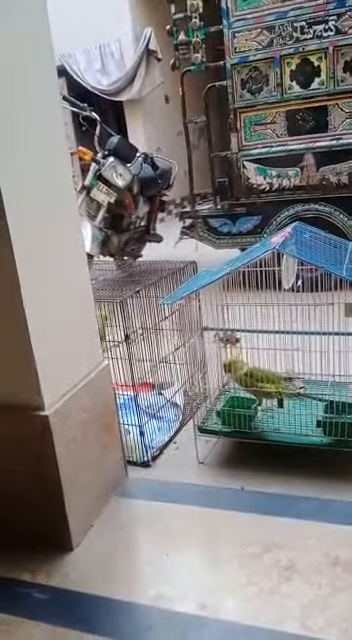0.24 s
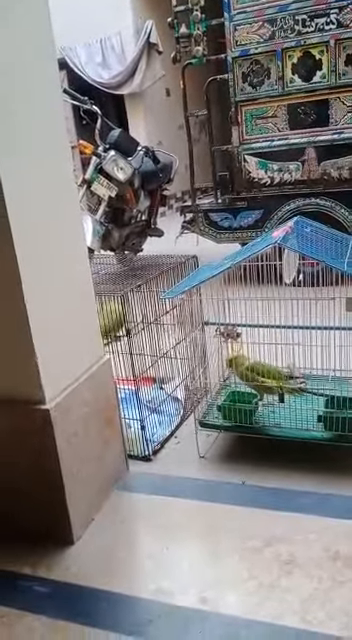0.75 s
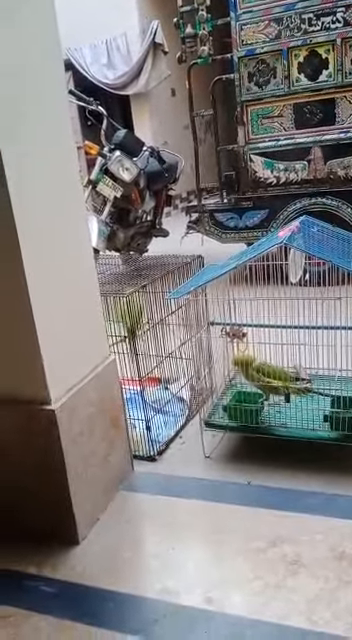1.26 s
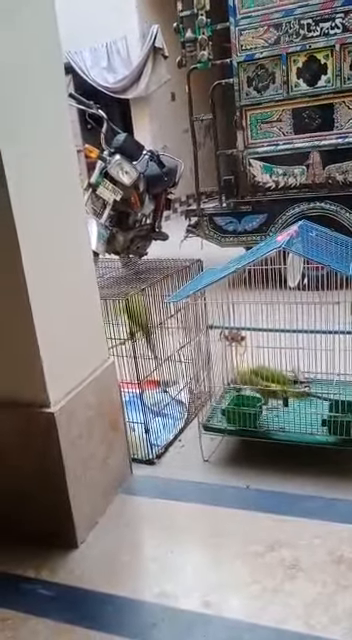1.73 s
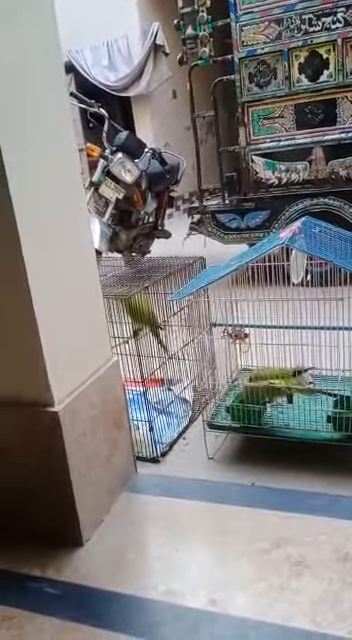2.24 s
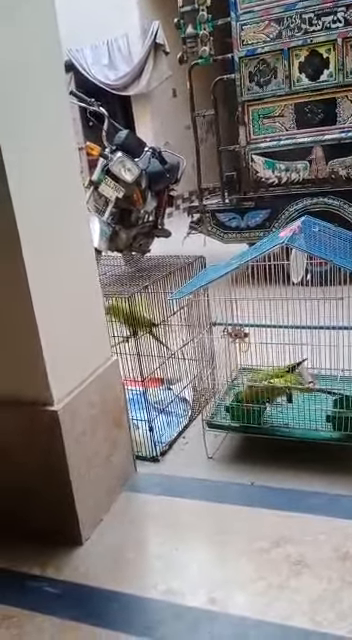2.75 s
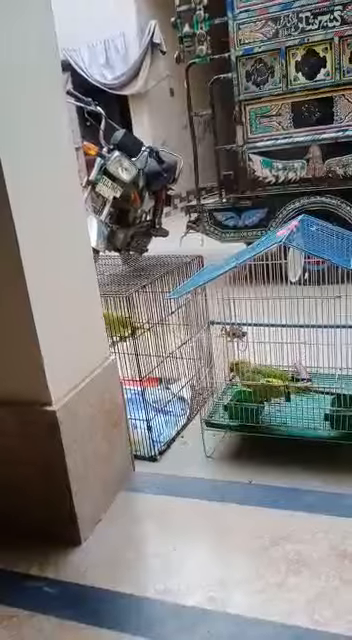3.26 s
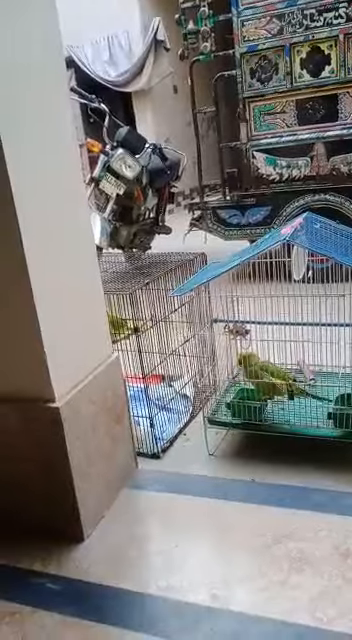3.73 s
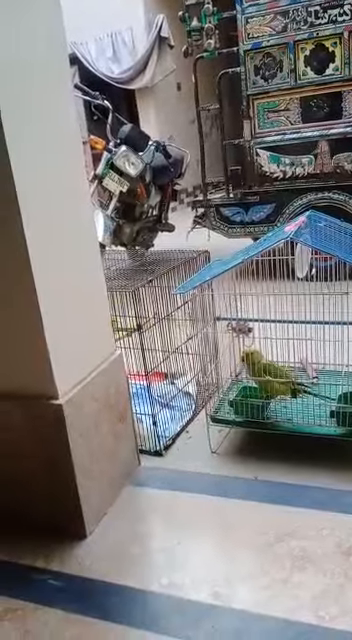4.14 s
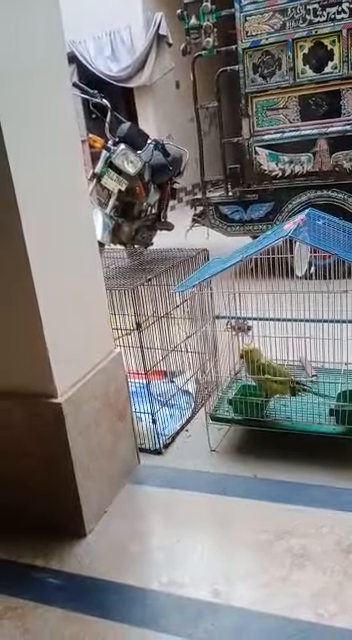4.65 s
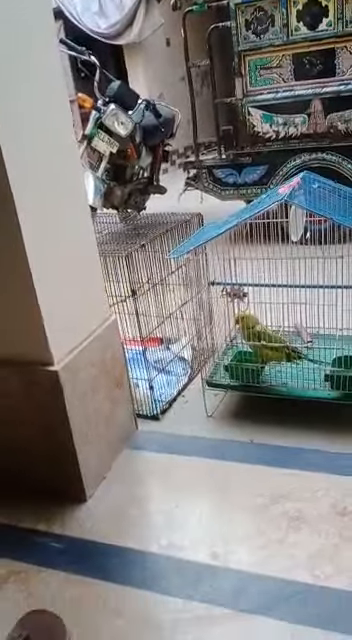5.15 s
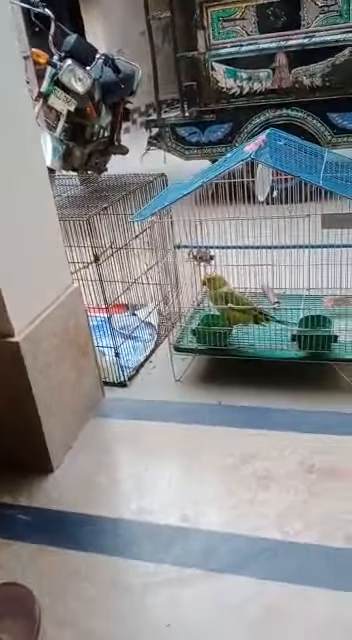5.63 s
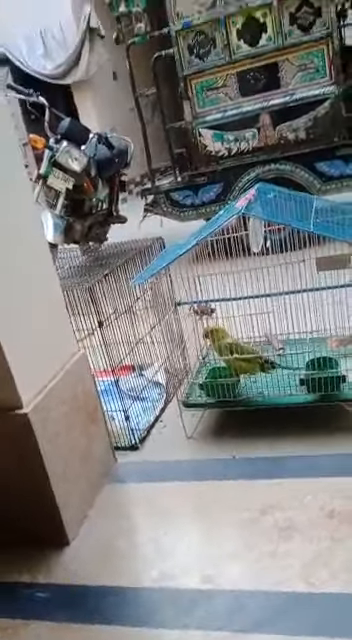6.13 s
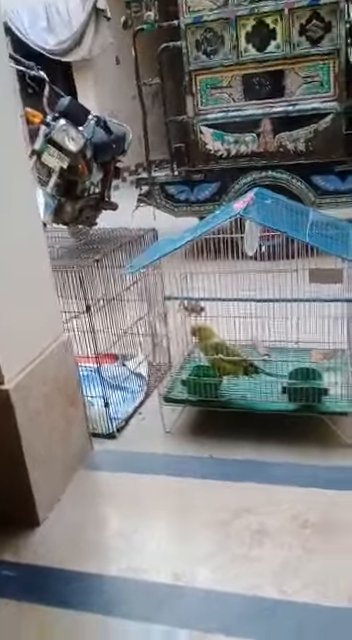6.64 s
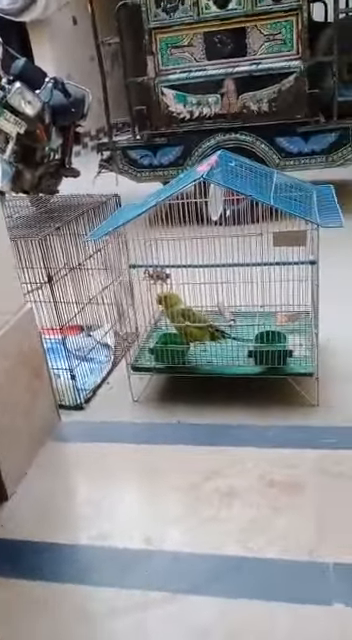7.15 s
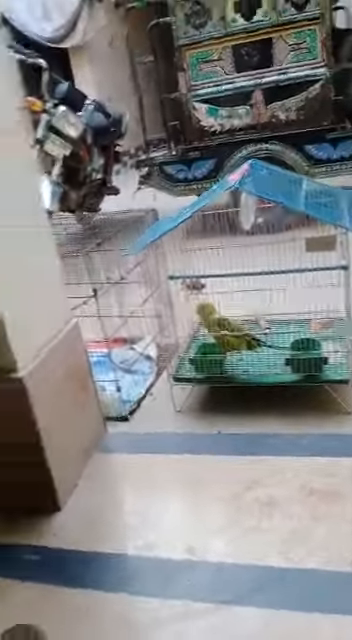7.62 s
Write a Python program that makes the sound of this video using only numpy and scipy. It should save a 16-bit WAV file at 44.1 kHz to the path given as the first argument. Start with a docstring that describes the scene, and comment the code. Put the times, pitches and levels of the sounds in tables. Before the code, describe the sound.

Parakeets give quick bright chirps and harsh squawks in an echoing tiled entrance, thinning to soft cheeps, then one long rising call over faint street noise.

```python
"""Two caged parakeets call in a tiled entrance: gliding chirps, harsh squawks, then one long rising call.
Each voice is a stack of harmonics that roughness breaks up, filtered by throat, windpipe and beak.
Softer cheeps and faint far birds are gliding sines; the street's drone, hum, wash and dull bumps are
filtered noise, its bustle blurred sines. Echoes and a decaying tail surround all but the drone, hum and wash."""
import sys
import numpy as np
from scipy import signal
from scipy.fft import rfft, irfft, next_fast_len
from scipy.io import wavfile
from scipy.ndimage import uniform_filter1d

SR = 44100
rng = np.random.default_rng(int(sys.argv[2]) if len(sys.argv) > 2 else 0)


def transcribe(signal):
    """Save signal, clipped to [-1, 1], as a 16-bit WAV file at the path in sys.argv[1]."""
    frames = np.atleast_2d(signal).T
    limited = np.clip(frames, -1, 1)
    pcm = np.round(limited * 32767).astype(np.int16)
    wavfile.write(sys.argv[1], SR, pcm)


N = 347949
T = np.arange(N) / SR

# broad filtering by the bird's throat: frequency_hz, gain_db
THROAT_SPECTRUM = [(500, -41.5), (800, -17), (1100, -6), (1700, -2.5), (2400, 6), (3700, 6.5), (4600, 2.5),
                   (5600, -5.5), (6500, -23), (8000, -49.5), (9500, -79.5), (11500, -55), (14000, -49.5),
                   (16000, -39.5)]


def from_db(db):
    """Level to amplitude: 20 dB is a factor of ten."""
    return 10 ** (np.asarray(db) / 20)


def rms_one(x):
    """Normalization: scales a signal to unit root-mean-square."""
    return x / np.sqrt(np.mean(x ** 2) + 1e-20)


def at_hz(points, hz):
    """Logarithmic pitch scale: interpolates a table along log frequency."""
    points = np.array(points)
    return np.interp(np.log(np.maximum(hz, 1)), np.log(points[:, 0]), points[:, 1])


def colour(x, spectrum):
    """Linear filtering: multiplies the Fourier spectrum by a smooth gain curve."""
    size = next_fast_len(len(x) + 512)
    gain = from_db(at_hz(spectrum, np.fft.rfftfreq(size, 1 / SR)))
    return irfft(rfft(x, size) * gain, size)[:len(x)]


def band(x, low_hz, high_hz):
    """Band-pass filtering: keeps the energy between two frequencies."""
    return signal.sosfilt(signal.butter(2, [low_hz, high_hz], "band", fs=SR, output="sos"), x)


def wobble(rate_hz, size=N, count=()):
    """Low-passed noise: random motion up to a given rate, one track or several, of spread 1."""
    settling = 1000  # samples dropped while the filter starts
    noise = rng.standard_normal((*count, size + settling))
    lowpass = signal.butter(4, rate_hz, fs=SR, output="sos")
    return rms_one(signal.sosfilt(lowpass, noise)[..., -size:])


def swell(start_s, length_s):
    """Half-sine envelope: returns a short sound's samples, its progress 0-1 and its rounded level."""
    at = np.arange(int(start_s * SR), min(N, int((start_s + length_s) * SR)))
    progress = np.linspace(0, 1, len(at))
    return at, progress, np.sin(np.pi * progress)


def glide_tone(pitch_hz):
    """Frequency modulation: the phase of a sine is the running sum of its pitch."""
    return np.sin(2 * np.pi * np.cumsum(pitch_hz) / SR)


def porch(x, early_db, tail_db, early_s=0.035, build_s=0.053):
    """Reverberation: floor, pillar and walls return sharp echoes; behind them a tail dies band by band."""
    # reverberation time, for a 60 dB decay: frequency_hz, decay_s
    decay_times = [(300, 0.067), (1500, 0.4), (3000, 0.39), (5500, 0.39), (14000, 0.4)]
    t = T[:SR]
    sparse = rng.random(SR) < 700 / SR  # about 700 echoes per second
    echoes = rng.standard_normal(SR) * sparse * np.exp(-t / early_s) * (t > .002)
    edges_hz = np.geomspace(100, 16000, 9)
    tail = np.zeros(SR)
    for low_hz, high_hz in zip(edges_hz, edges_hz[1:]):
        decay_s = at_hz(decay_times, np.sqrt(low_hz * high_hz))
        tail += band(rng.standard_normal(SR), low_hz, high_hz) * 1000 ** (-t / decay_s)
    tail *= 1 - np.exp(-t / build_s)
    # early and tail levels are relative to the direct sound
    response = from_db(early_db) * echoes / np.linalg.norm(echoes)
    response += from_db(tail_db) * tail / np.linalg.norm(tail)
    response[0] += 1
    return signal.fftconvolve(x, response / np.linalg.norm(response))[:N]


def street(wash_db=-55.5, hum_hz=398, hum_db=-68):
    """Filtered noise: a broad wash of far traffic, a low drone band and a narrow, wavering hum."""
    # shape of the wash, density relative: frequency_hz, density_db
    wash_spectrum = [(30, -29.5), (60, -20), (130, -18.5), (240, -1.5), (400, -6.5), (700, -7), (850, -11),
                     (1350, -6.5), (2200, -12.5), (3500, -20.5), (4800, -26), (6600, -38.5), (8000, -62),
                     (11000, -60.5), (14500, -51.5)]
    # course of the low drone: time_s, level_db
    drone_level = [(0, -63), (.22, -79), (.37, -58), (.57, -76.5), (.77, -61.5), (1.93, -63), (2.68, -72.5),
                   (2.83, -62.5), (3.18, -73.5), (3.5, -65), (4.2, -75), (4.57, -74), (4.66, -63),
                   (5.4, -66), (5.78, -62), (6.4, -65.5), (7.35, -74.5), (7.89, -71.5)]
    waver = from_db(.5 * wobble(rate_hz=6))
    wash = from_db(wash_db) * waver * rms_one(colour(rng.standard_normal(N), wash_spectrum))
    drone_noise = rms_one(band(rng.standard_normal(N), 82, 111.4))
    drone = from_db(np.interp(T, *np.transpose(drone_level))) * drone_noise
    hum = from_db(hum_db) * rms_one(band(rng.standard_normal(N), hum_hz - 10, hum_hz + 10))
    return wash + drone + hum


def bustle(count=130, low_hz=210, high_hz=2400, level_db=-60, fall_db=3, spread_db=8,
           length_s=0.055, blur=.05):
    """Random frequency modulation: indistinct street activity as faint blurred swells."""
    out, shake = np.zeros(N), wobble(rate_hz=75)
    for when, height, distance in rng.random((count, 3)):
        at, _, envelope = swell(when * (T[-1] - length_s), length_s)
        pitch_hz = low_hz * (high_hz / low_hz) ** height * (1 + blur * shake[at])
        amplitude = from_db(level_db - fall_db * height - spread_db * distance)
        out[at] += amplitude * envelope * glide_tone(pitch_hz)
    return out


def bumps(spread=1.132):
    """Narrow-band noise: far knocks, blurred by distance into short low swells."""
    # dull bumps in the street: start_s, length_s, centre_hz, level_db
    bump_list = [(0.427, 0.072, 447, -55), (1.135, 0.1, 420, -52.5), (1.585, 0.095, 243, -44.5),
                 (1.795, 0.099, 241, -53), (2.104, 0.15, 244, -51), (2.645, 0.061, 376, -52),
                 (3.233, 0.079, 243, -52.5), (3.463, 0.077, 251, -53.5), (3.713, 0.12, 594, -53.5),
                 (4.253, 0.068, 266, -49), (5.237, 0.061, 237, -54), (5.427, 0.098, 397, -53.5),
                 (7.071, 0.14, 402, -53), (7.093, .08, 238, -54), (6.177, 0.051, 92, -53)]
    out = np.zeros(N)
    for start_s, length_s, centre_hz, level_db in bump_list:
        at, _, envelope = swell(start_s, length_s)
        noise = band(rng.standard_normal(SR), centre_hz / spread, centre_hz * spread)
        out[at] += from_db(level_db) * envelope * rms_one(noise[-len(at):])
    return out


def twitter(count=130, low_hz=2200, high_hz=6000, level_db=-62, fall_db=9, spread_db=7,
            length_s=0.049, glide=0.027):
    """Gliding sines: small birds far down the street slur faintly at random, weaker with height."""
    out = np.zeros(N)
    for when, height, slope, distance in rng.random((count, 4)):
        at, progress, envelope = swell(when * (T[-1] - length_s), length_s)
        pitch_hz = (low_hz + (high_hz - low_hz) * height) * (1 + glide * (.5 - slope) * progress)
        amplitude = from_db(level_db - fall_db * height - spread_db * distance)
        out[at] += amplitude * envelope * glide_tone(pitch_hz)
    return out


def cheeps(trill_hz=170, unevenness=.25):
    """Frequency modulation: thin whistles glide while a fast, uneven trill sweeps their pitch."""
    # cheeps, and first the fading echo of an earlier call:
    # start_s, length_s, start_hz, end_hz, trill_depth_hz, level_db
    cheep_list = [(0, 0.064, 2210, 2236, 80.4, -48), (1.727, 0.097, 2555, 2850, 58.9, -46),
                  (1.763, 0.081, 3123, 3840, 460, -39.5), (1.809, 0.061, 4140, 4320, 117, -43.5),
                  (2.468, 0.19, 4610, 4380, 40, -67), (3.269, .11, 3810, 3570, 39.4, -61),
                  (3.577, 0.11, 3145, 3680, 460, -38), (3.734, 0.14, 3936, 3750, 50, -54.5),
                  (3.74, .12, 4530, 4280, 40, -64), (4.265, 0.062, 5800, 5580, 50, -64.5),
                  (4.302, 0.15, 4470, 3750, 60, -57.5), (4.726, 0.052, 2603, 2610, 60.4, -50),
                  (4.762, 0.078, 3140, 3770, 490, -38.5), (4.801, 0.12, 4110, 4010, 60.7, -48.5),
                  (4.945, 0.11, 4010, 3630, 29.8, -57.5), (4.952, 0.07, 4280, 4540, 50, -58.5),
                  (5.044, 0.035, 2170, 2186, 29.4, -57), (5.266, 0.052, 4700, 4440, 40, -61),
                  (5.686, 0.05, 4450, 3240, 80, -55.5), (6.09, 0.15, 4370, 3990, 368, -45),
                  (6.109, 0.07, 3590, 3430, 29.8, -45.5), (6.156, 0.078, 3484, 2970, 284, -37),
                  (6.203, 0.1, 3566, 3470, 645, -49.5), (6.348, 0.091, 4580, 4030, 40, -57),
                  (6.822, 0.064, 4460, 4400, 40.4, -62.5)]
    out = np.zeros(N)
    trill = glide_tone(trill_hz * (1 + unevenness * wobble(rate_hz=140)))
    for start_s, length_s, start_hz, end_hz, depth_hz, level_db in cheep_list:
        at, progress, envelope = swell(start_s, length_s)
        pitch_hz = start_hz + (end_hz - start_hz) * progress + depth_hz * trill[at]
        # the root of two gives the sine unit RMS
        out[at] += from_db(level_db) * envelope * np.sqrt(2) * glide_tone(pitch_hz)
    return out


def resonance(hz, centre_hz, width_hz):
    """Resonance curve: a bell of height 1 that halves at width_hz from its centre."""
    return 1 / (1 + ((hz - centre_hz) / width_hz) ** 2)


def syrinx(pitch_hz, rough, windpipe_hz, beak_hz, bright_db, jitter=0.045, quaver=0.01,
           windpipe_db=8, beak_db=10, bright_hz=4800):
    """Source and filter: roughness makes harmonics uneven, blurs them and adds half-pitch partials."""
    size = len(pitch_hz)
    unevenness = (quaver + jitter * rough) * wobble(rate_hz=270, size=size)
    phase = 2 * np.pi * np.cumsum(pitch_hz * (1 + unevenness)) / SR
    order = np.arange(2, 21)[:, None] / 2  # 1, 1.5, 2 ... 10 times the pitch
    hz = order * pitch_hz
    tracks = dict(size=size, count=(len(order),))
    # windpipe and open beak lift the partials near their resonances
    lift_db = windpipe_db * resonance(hz, windpipe_hz, width_hz=110)
    lift_db += beak_db * resonance(hz, beak_hz, width_hz=530)
    # brightness acts as a steep shelf above bright_hz
    lift_db += bright_db / (1 + (bright_hz / hz) ** 20)
    # each partial swells and fades a little by itself
    lift_db += 2.2 * wobble(rate_hz=45, **tracks)
    chaos = rough * (wobble(rate_hz=207, **tracks) + 1j * wobble(rate_hz=200, **tracks))
    whole = order % 1 == 0
    strength = np.where(whole, 1 - rough + chaos, rough * chaos)
    waves = np.real(strength * np.exp(1j * order * phase))
    partials = from_db(lift_db) * waves / np.sqrt(np.maximum(order, 2))
    return rms_one(colour(partials.sum(axis=0), THROAT_SPECTRUM))


def utter(pitch_hz, rough, windpipe_hz, beak_hz, bright_db, rasp_db, high_band_db):
    """Added noise: a broad rasp and a very faint high band grow with roughness; level evened to 1."""
    rough = np.clip(rough, 0, 1)
    noise = rng.standard_normal(len(pitch_hz))
    rasp = from_db(rasp_db) * rms_one(colour(noise, THROAT_SPECTRUM))
    high_band = from_db(high_band_db) * rms_one(band(band(noise, 12500, 15500), 12500, 15500))
    voice = syrinx(pitch_hz, rough, windpipe_hz, beak_hz, bright_db) + rough * (rasp + high_band)
    # dividing by the running RMS leaves the level to the caller's envelope
    return voice / np.sqrt(uniform_filter1d(voice ** 2, size=500) + 1e-9)


def parakeets(opening_db=5, arch=1.5, collapse=2.4, release_s=.005, rasp_release_s=.031):
    """Pitch contour and resonance: short calls climb, then fall, and brighten as the beak opens."""
    # syllables: start_s, length_s, attack_s, top_s (from the start), start_hz, top_hz, end_hz, level_db,
    # crescendo_db, rough_start (0-1), rough_end (0-1), windpipe_hz, beak_hz, bright_db
    # (roughness above 1 is limited to 1 in the voice)
    syllables = [ (.036, .056, 0.018, 0.041, 1153, 1302, 1305, -28.5, 6.5, 0.26, .02, 2570, 3640, 9),
                 (0.091, 0.077, 0.0028, .006, 1077, 1049, 968, -30.5, -7.5, 0.34, 0.5, 2040, 3790, 4.5),
                 (0.281, 0.12, 0.07, 0.063, 1324, 1566, 1372, -27.5, 2, 0.27, 0.26, 1480, 3280, 6),
                 (0.589, 0.07, 0.031, 0.0028, 1454, 1405, 1320, -32, 1, 0.1, 0, 2700, 4300, 13),
                 (0.65, 0.076, 0.0059, 0.003, 1300, 1258, 1121, -32, -1, 0.19, 0, 2334, 4930, 2.5),
                 (1.006, .103, 0.036, .028, 1676, 1966, 1221, -26, 11, 0.53, 0.28, 1680, 2750, 2.5),
                 (1.375, 0.12, 0.026, 0.032, 1149, 1756, 1301, -20.5, -2.5, 0.36, .58, 1505, 2840, -0.5),
                 (2.118, .098, 0.04, .05, 1056, 1158, 1123, -31.5, -5.5, 0.4, 1.17, 2230, 3750, -7.5),
                 (2.214, 0.026, 0.0071, 0.022, 1496, 1560, 1560, -34, 1, 0.3, .2, 1550, 3200, 1.5),
                 (2.233, .085, 0.012, .038, 1710, 1994, 1718, -28, 0, .1, .07, 1940, 3700, 6),
                 (2.312, .014, .006, 0.0026, 1710, 1742, 1565, -13.5, -2, 0.02, 0.17, 1950, 3400, -4.5),
                 (2.326, .048, 0.0052, 0.038, 1510, 1520, 1504, -30.5, -3.5, .12, 0.5, 1660, 3250, -1.5),
                 (2.712, 0.15, .028, 0.051, 1065, 1198, 1008, -23, 1.5, 0.78, 0.77, 1090, 2370, -9.5),
                 (3.422, 0.035, .014, 0.01, 1590, 1540, 1522, -29.5, 1, 0.47, 0.39, 2330, 3000, 0.5),
                 (3.449, 0.11, 0.021, 0.00598, 1487, 1470, 1177, -24.5, 2, .6, 0.38, 2380, 3030, 4)]
    out = np.zeros(N)
    for (start_s, length_s, attack_s, top_s, start_hz, top_hz, end_hz, level_db, crescendo_db,
         rough_start, rough_end, windpipe_hz, beak_hz, bright_db) in syllables:
        at, progress, _ = swell(start_s, length_s)
        t = progress * length_s
        # clear notes arch over; rough ones drop at once
        fall_power = max(arch - collapse * (rough_start + rough_end) / 2, .4)
        climb = np.sin(np.pi / 2 * np.minimum(t / top_s, 1))
        fall = np.clip((t - top_s) / max(length_s - top_s, 1e-3), 0, 1) ** fall_power
        pitch_hz = start_hz + (top_hz - start_hz) * climb + (end_hz - top_hz) * fall
        rough = rough_start + (rough_end - rough_start) * progress
        # a clear note stops at once; a rough one dies away more slowly
        ending_s = release_s + rasp_release_s * rough_end
        ramp = np.clip(np.minimum(t / attack_s, (length_s - t) / ending_s), 0, 1)
        gate = np.sin(np.pi / 2 * ramp) ** 2
        envelope = gate * from_db(level_db + crescendo_db * (progress - .5))
        brightness_db = bright_db + opening_db * (progress - .5)
        out[at] += envelope * utter(pitch_hz, rough, windpipe_hz, beak_hz, brightness_db,
                                    rasp_db=-14.5, high_band_db=-49.5)
    return out


def long_call(fade_s=.006):
    """Pitch contour: one call rises by almost an octave, clears at the top and breaks up as it falls."""
    # course of the voice: time_s, pitch_hz, rough (0-1), windpipe_hz, beak_hz, bright_db
    call_course = [(7.045, 689, 0.24, 2150, 3500, -13), (7.138, 720, 0.41, 1550, 4140, -25),
                   (7.2, 837, 0.09, 1630, 4200, -13), (7.245, 916, 0.09, 1730, 3800, -2),
                   (7.295, 1071, 0.32, 1960, 4300, 5.5), (7.335, 1120, 0.07, 1125, 4560, 7),
                   (7.366, 1162, 0.09, 1160, 4030, -6), (7.418, 1319, 0.03, 1340, 3070, -10),
                   (7.451, 1217, 0.18, 1260, 3470, -8), (7.481, 1079, 0.33, 2150, 3500, 6.5),
                   (7.56, 904, 0.66, 2000, 3900, -5.5)]
    # course of its level: time_s, level_db
    call_level = [(7.045, -55), (7.115, -46.5), (7.145, -35), (7.22, -29.5), (7.31, -31.5), (7.39, -28),
                  (7.463, -29), (7.5, -41.5), (7.56, -53)]
    out = np.zeros(N)
    time_s, *columns = np.transpose(call_course)
    at = np.arange(int(time_s[0] * SR), int(time_s[-1] * SR))
    t = T[at]
    edges = np.clip(np.minimum(t - time_s[0], time_s[-1] - t) / fade_s, 0, 1)
    tracks = [np.interp(t, time_s, column) for column in columns]
    voice = utter(*tracks, rasp_db=-24, high_band_db=-40.5)
    out[at] = voice * edges * from_db(np.interp(t, *np.transpose(call_level)))
    return out


def scene():
    """Superposition: street, far birds and near parakeets add, each with its share of reverberation."""
    far_street = porch(bumps() + bustle(), early_db=-13.5, tail_db=-9.5)
    far_birds = porch(twitter(), early_db=5, tail_db=-4.5)
    soft_cheeps = porch(cheeps(), early_db=4.5, tail_db=-9.5)
    chatter = porch(parakeets(), early_db=1.0, tail_db=-9.0)
    # the long call reaches the microphone more directly
    cry = porch(long_call(), early_db=-2, tail_db=-18)
    return (street() + far_street + far_birds + soft_cheeps + chatter + cry)[None]


def record(dry, cutoff_hz=15700):
    """Low-pass filtering: an elliptic filter cuts the top steeply."""
    return signal.sosfilt(signal.ellip(10, .1, 80, cutoff_hz, fs=SR, output="sos"), dry)


dry = scene()
out = record(dry)
transcribe(out)
```